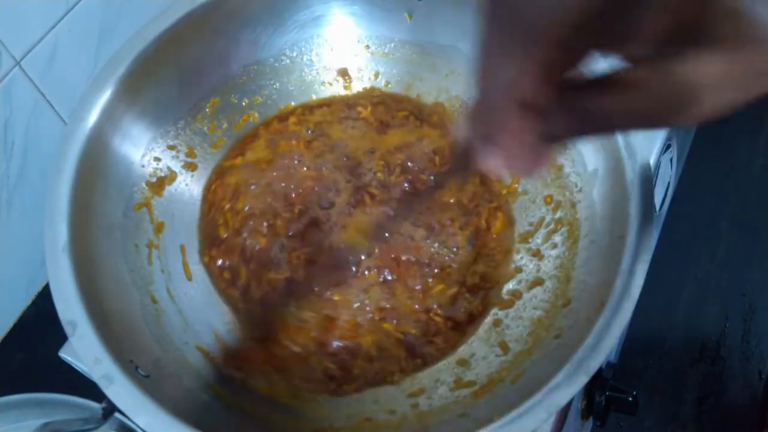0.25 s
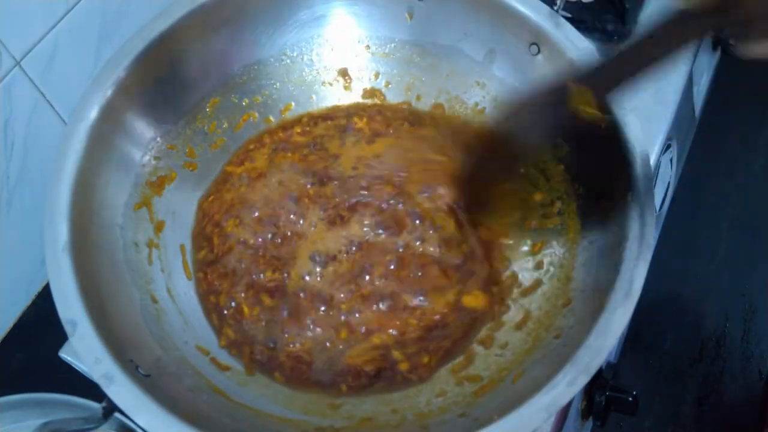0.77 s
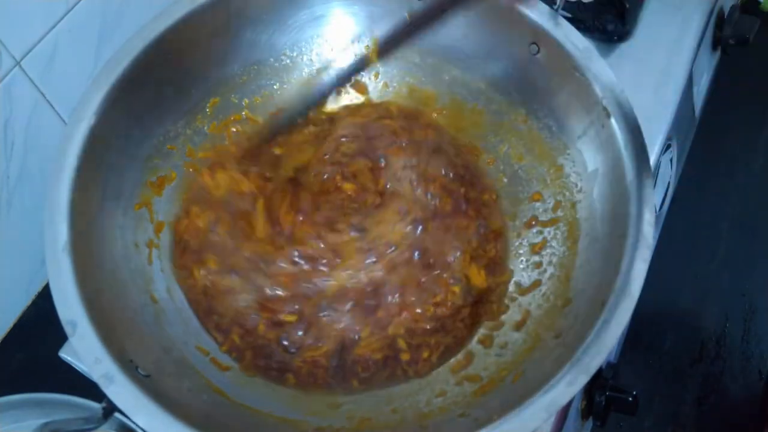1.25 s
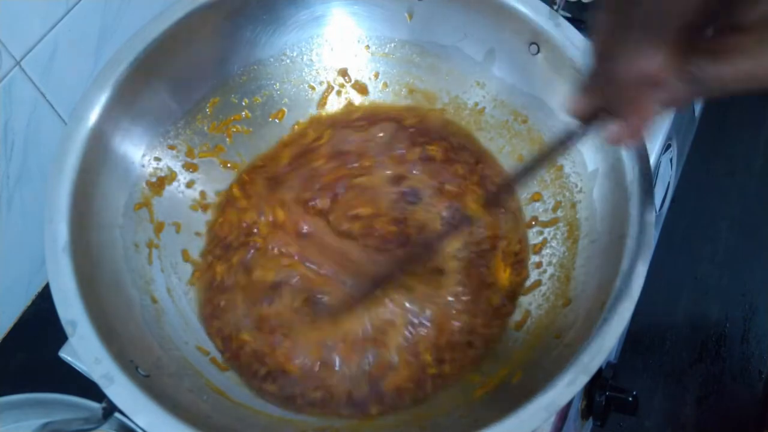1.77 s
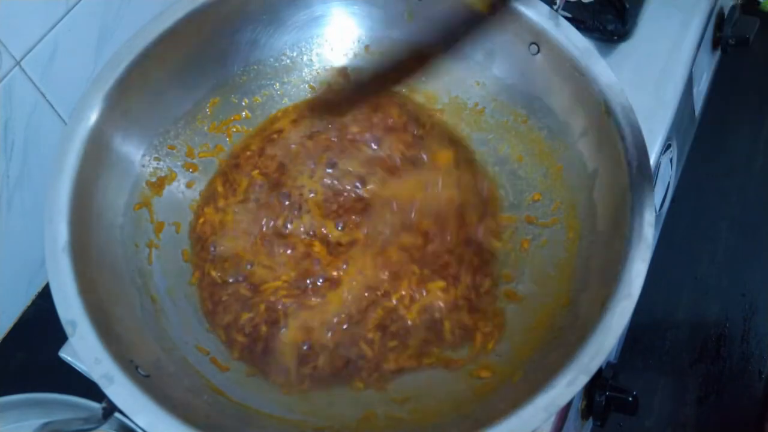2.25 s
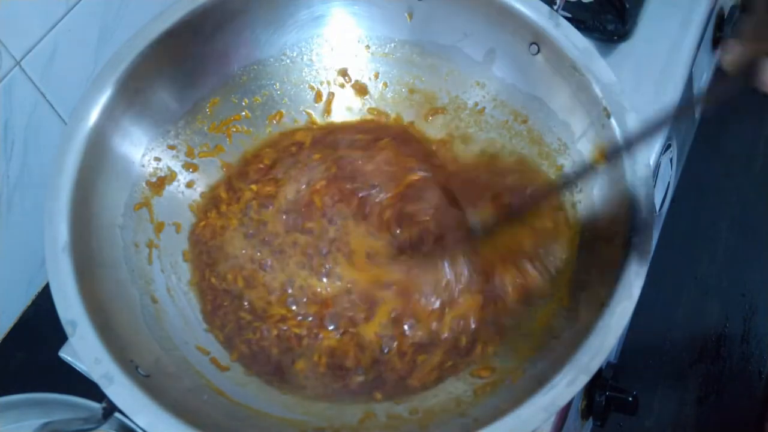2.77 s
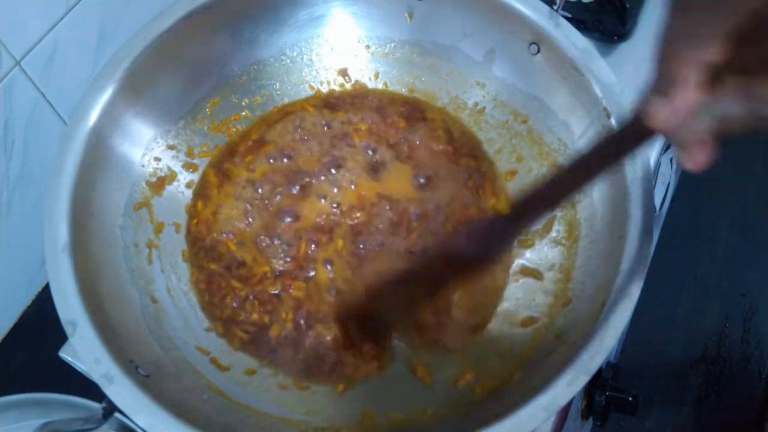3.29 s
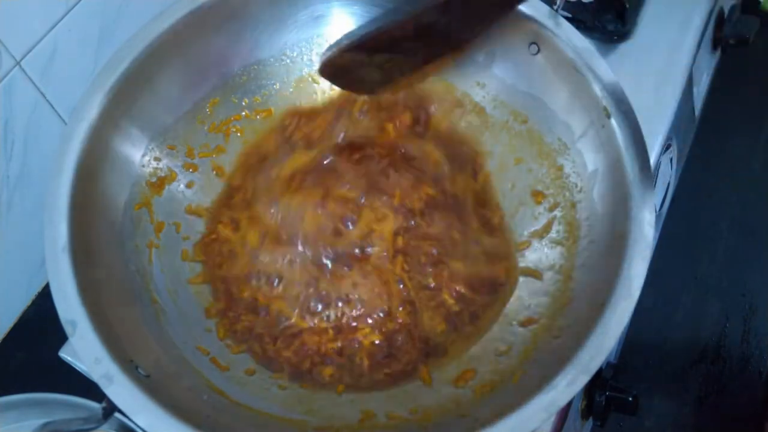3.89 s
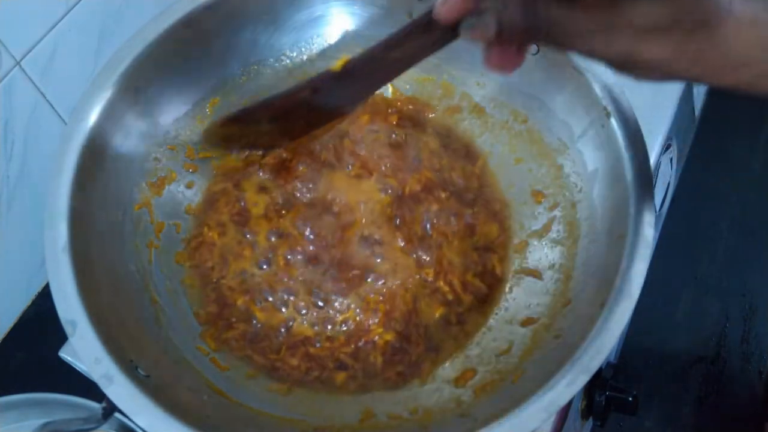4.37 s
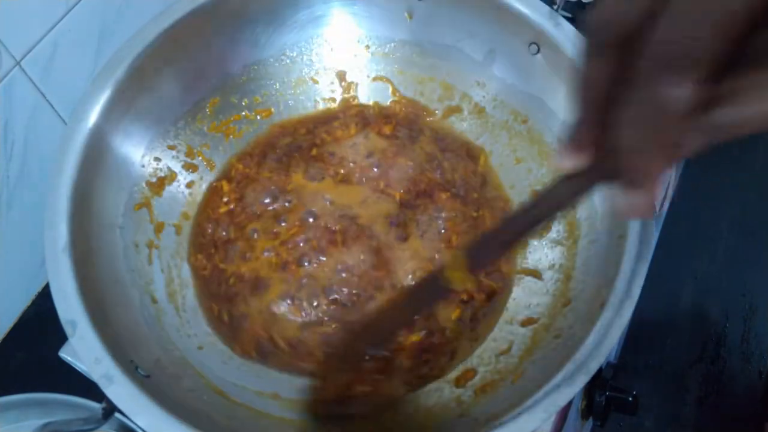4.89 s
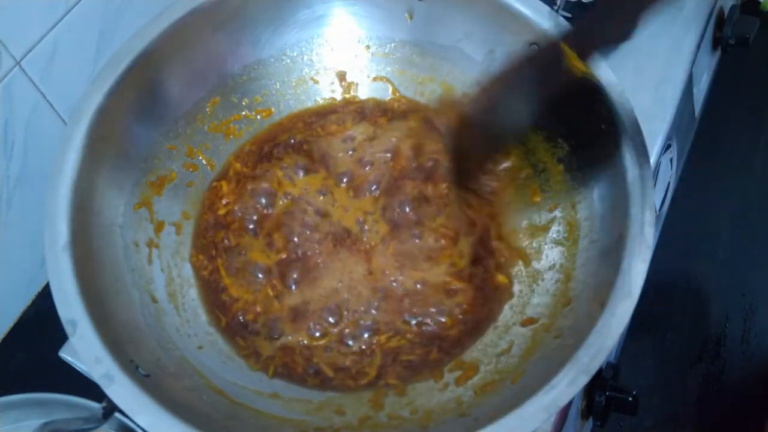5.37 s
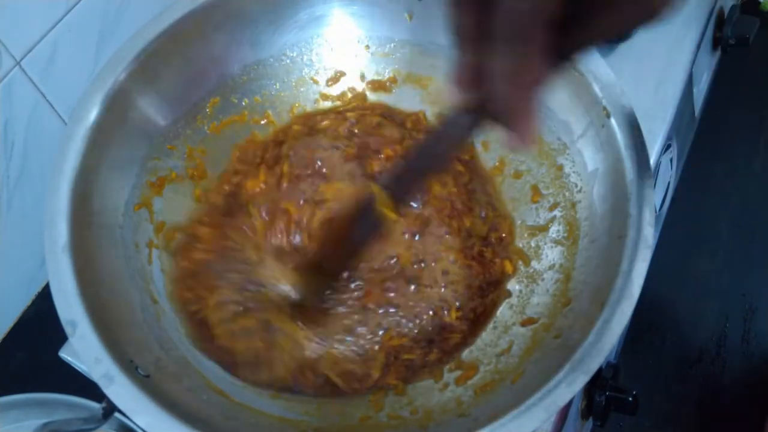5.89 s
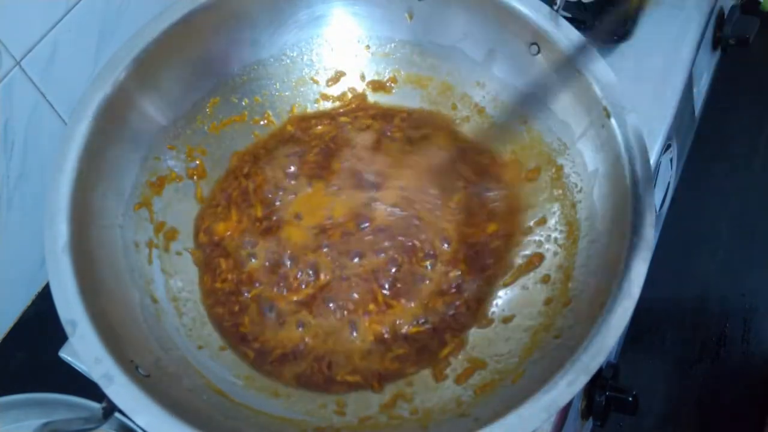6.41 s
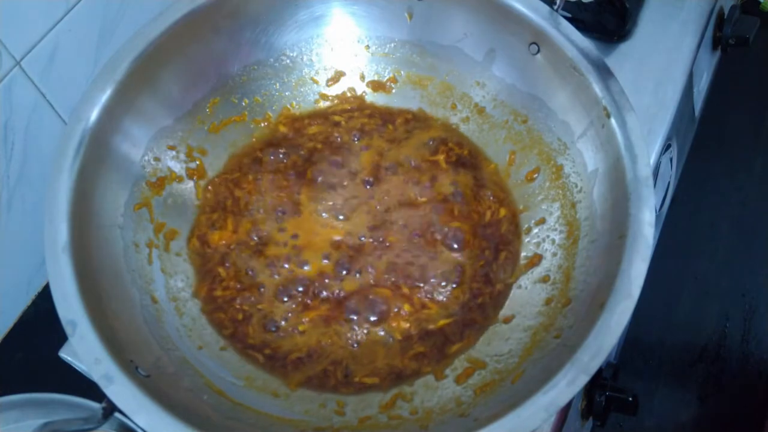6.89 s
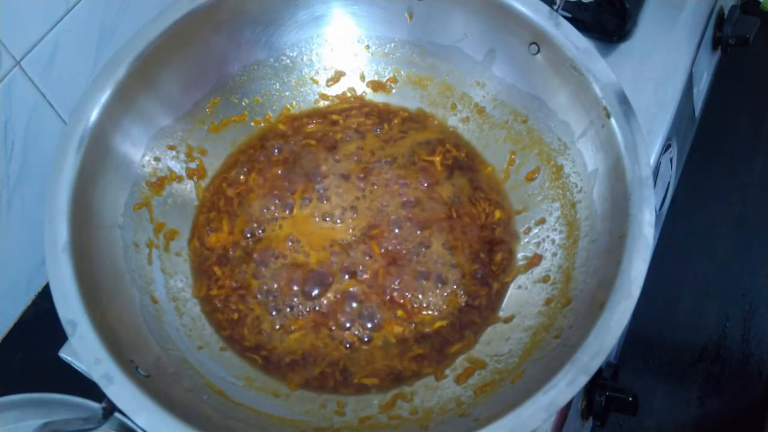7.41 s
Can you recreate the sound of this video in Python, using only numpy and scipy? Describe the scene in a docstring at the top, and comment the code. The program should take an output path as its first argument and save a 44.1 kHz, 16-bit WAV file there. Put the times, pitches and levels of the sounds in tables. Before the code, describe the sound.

Sticky simmering mixture pops and spits as wood stirs through it in a metal pan, with gritty scrapes, wet smacks and a ringing knock.

```python
"""A low hum, dragging wood and plopping bubbles run throughout: thick sweet pulp is stirred in a thin metal pan.
Random clicks shake pan resonances for the drag and set off short cycles in the bowl for the bubbles.
Filtered noise makes the hum, scraping and squeaks; bursts make the spits, pops and wet smacks.
A wooden spatula also knocks on the pan, as a thud, a crack and ringing sines.
A short noise tail echoes in the small tiled kitchen; the microphone's right port faces the pan."""
import sys
import numpy as np
from scipy import signal
from scipy.io import wavfile
from scipy.ndimage import uniform_filter1d

SR = 44100
rng = np.random.default_rng(int(sys.argv[2]) if len(sys.argv) > 2 else 0)


def to_wav(s):
    """Save 16-bit WAV."""
    ch = np.atleast_2d(s).T  # columns
    pcm = np.round(np.clip(ch, -1, 1) * 32767)  # PCM
    wavfile.write(sys.argv[1], SR, pcm.astype(np.int16))


N = 337365


def amp(db):
    """Turns dB into a gain."""
    return 10 ** (np.asarray(db) / 20)


def evened(x):
    """Scales a sound to an rms of 1."""
    return x / np.sqrt(np.mean(x ** 2) + 1e-20)


def read(points, hz):
    """Reads a two-column table at any pitch, along a logarithmic pitch axis."""
    table_hz, value = np.transpose(points)
    return np.interp(np.log(hz + 1), np.log(table_hz + 1), value)


def curve_at_samples(rows):
    """Joins the points of a time curve with straight lines, one value per sample."""
    s, value = np.transpose(rows)
    return np.interp(np.arange(N) / SR, s, value)


def add(mix, s, sound):
    """Mixes a sound in at time s, cut off where the mix ends."""
    part = mix[..., round(s * SR):][..., :sound.shape[-1]]
    part += sound[..., :part.shape[-1]]


def placed(x, side_db):
    """Two channels whose mean is x, the left side_db above the right."""
    ratio = amp(side_db)
    return np.array([2 * ratio / (1 + ratio) * x, 2 / (1 + ratio) * x])


def resonate(x, hz, width):
    """A resonance of gain 1: shifts hz down to zero, smooths, and shifts back."""
    turn = np.exp(2j * np.pi * np.cumsum(hz * np.ones(len(x))) / SR)
    memory = np.exp(-np.pi * width / SR)
    smooth = signal.lfilter([1 - memory], [1, -memory], x / turn)
    return 2 * (turn * smooth).real


def band(x, low_hz, high_hz):
    """Keeps the sound between two pitches."""
    sos = signal.butter(3, [low_hz, high_hz], "bandpass", fs=SR, output="sos")
    return signal.sosfilt(sos, x)


def clicks(per_s, spread_db):
    """A random train of clicks of either sign, a few of them large."""
    size = amp(spread_db * np.minimum(rng.exponential(1, N), 5))
    size = size * rng.choice([-1., 1.], N)
    return size * (rng.random(N) < per_s / SR)


def blip(hz, cycles):
    """A cavity bursts: a few cycles that swell and die, with a peak of 1."""
    u = np.arange(int(4 * cycles * SR / hz) + 8) * hz / SR / cycles
    wave = u ** 2 * np.exp(-4 * u) * np.sin(2 * np.pi * cycles * u)
    return wave / abs(wave).max()


# How alike the two channels of noise are. Each row: pitch in Hz, likeness from 0 to 1.
LIKENESS = [(60, 0.9), (400, 0.93), (1200, 0.53), (3000, 0.05), (12000, 0.36)]
# How noise differs between the microphone ports. Each row: pitch in Hz, left above right in dB.
PORT_BALANCE = [(100, -11.5), (500, -27), (1200, -11), (3000, -2), (9000, -9.5), (14000, 1.5)]


def noise(spectrum_db, frames, size=512, patchy_db=0.):
    """Two partly alike channels of noise, shaped by spectrum_db(hz, s) and by random patches."""
    hz = np.fft.rfftfreq(size, 1 / SR)[:, None]
    s = np.arange(frames) * size / 4 / SR
    a, b, c, d, patches = rng.standard_normal((frames, size // 2 + 1, 5)).T
    patches = uniform_filter1d(patches, size=2, axis=0)
    patches = evened(uniform_filter1d(patches, size=24, axis=1))
    same = np.clip(read(LIKENESS, hz), -1, 1)
    right = a + 1j * b
    left = same * right + np.sqrt(1 - same ** 2) * (c + 1j * d)
    ratio = amp(read(PORT_BALANCE, hz))
    level = amp(spectrum_db(hz, s) + patchy_db * patches)
    z = np.array([ratio * left, right]) / (1 + ratio) * level
    return signal.istft(z, nperseg=size, noverlap=size * 3 // 4)[1]


def summed(levels_db):
    """Level in dB of sounds heard together: their powers add up."""
    return 10 * np.log10(sum(amp(db) ** 2 for db in levels_db))


def peaked(s, swell, fade, db):
    """A level that climbs 20 dB in swell seconds to its peak at s and falls 20 dB in fade seconds."""
    late = np.arange(N) / SR - s
    drop = np.maximum(late / max(fade, .01), -late / max(swell, .005))
    return np.maximum(db - 20 * drop, -150)


# Spatula blows on the pan. Each row: start in seconds, level in dB, share of treble in dB,
# extra low ring in dB, basic left above right in dB.
BLOWS = [(1.44, -6, -1, 0, -6), (2.488, -16, -19, -1, -5), (2.521, -23.5, -11, -11, -5),
         (4.027, -23.5, -33, -1, -4)]
BUSY_DB, KNOCK_DB = -55, -15  # usual bubbling and a reference knock


def stirred(curve, usual_db, follow, jolt_db, jolt_follow, t60):
    """Level of a layer: it follows a curve of bubbling, and every knock shakes it up for a moment."""
    jolts = [peaked(s + .005, .005, t60 / 3, jolt_db + jolt_follow * (db - KNOCK_DB))
             for s, db, *_ in BLOWS]
    busy_db = curve_at_samples(curve) - BUSY_DB
    return summed([usual_db + follow * busy_db] + jolts)


# Broad hush of the room. Each row: pitch in Hz, relative level in dB per Hz.
HUSH_SPECTRUM = [(15, -70.5), (25, -48), (97, 26), (127, 7.5), (180, 6), (317, 16), (463, -28),
                 (754, -23.5), (936, -64), (1260, -16), (1440, -5.5), (2350, -8.5), (11000, -16),
                 (13200, -53), (16000, -65)]
# Room resonances in the hum. Each row: pitch in Hz, width in Hz, level in dB.
HUM_RESONANCES = [(73.55, 5.4, -66), (105.2, 3.4, -62), (130.7, 2.8, -61.5)]
HUSH_DB = -57


def hum():
    """The steady room: a broad hush of noise and three low resonances."""
    hush = noise(lambda hz, s: read(HUSH_SPECTRUM, hz), N // 512 + 5, size=2048)[:, :N]
    drive = rng.standard_normal(N)
    low = sum(amp(db) * evened(resonate(drive, hz, width)) for hz, width, db in HUM_RESONANCES)
    return amp(HUSH_DB) * evened(hush) + placed(low, -11.5)


# Ringing modes of the pan. Each row: pitch in Hz, relative level in dB,
# time to fall 60 dB after a blow in seconds (shorter in the drag and the bubbles).
PAN_MODES = [(248.6, -12, 0.3), (321.8, 0, 0.36), (385, -12, 0.28), (440, -13, 0.3), (635, -15, 0.3),
             (743, -9, 0.2), (904, -16, .26), (1105, -10, 0.2), (1340, -24, 0.3), (3700, -34, 0.24),
             (4840, -20, 0.22), (4900, -16, 0.22), (5900, -37, 0.34), (7240, -25, 0.24)]
# How busily the pulp bubbles. Each row: time in seconds, busyness in dB (-55 is usual).
BUBBLING = [(0.0, -48.5), (0.149, -79), (0.231, -52.5), (0.47, -74.5), (0.7, -53), (0.83, -58),
            (0.88, -52.5), (1.34, -53), (1.409, -56), (1.73, -52), (2.0, -57), (2.32, -66), (2.66, -58.5),
            (2.75, -53.5), (2.92, -59.5), (3.6, -53.5), (3.68, -65.5), (3.83, -56), (3.96, -56.5),
            (4.28, -53), (4.5, -57.5), (4.81, -54.5), (5.18, -59.5), (5.279, -54), (6.67, -54.5),
            (7.01, -63), (7.07, -57), (7.65, -53.5)]
# How drag, large and middle bubbles (one row for each) follow the stirring.
# Each row: level at usual stirring in dB, dB per dB of stirring, jolt level after a -15 dB knock in dB,
# dB per dB of knock, time for the jolt to fall 60 dB in seconds.
LAYER_RULES = [(-53.5, 1, -36.5, 0.35, 0.28), (-56, 1.79, -42, -0.15, 0.28),
               (-52.5, 1.15, -43.5, 0.82, 0.25)]
# The spatula leans hard and drags louder.
# Each row: peak time in seconds, 20 dB swell in seconds, 20 dB fade in seconds, level in dB.
LEANS = [(0.7, 0.23, 0.29, -49), (2.752, 0.048, 0.071, -48), (3.3, 0.09, 0.23, -54),
         (3.83, 0.22, 0.086, -49), (5.297, 0.24, 0.27, -46), (6.271, 0.23, 0.43, -46)]
LIFT_S, LIFTED_DB = 7.5, -5.5  # the spatula leaves the pan and the drag drops


def drag():
    """Wood slips over the pan wall in small jerks and shakes its low modes, damped by the pulp."""
    jerks, damping = clicks(900, 3.), 5
    body = sum(amp(db) * resonate(jerks, hz, damping / t60) * np.sqrt(t60)
               for hz, db, t60 in PAN_MODES if hz < 600)
    body = evened(body) + 0.67 * evened(band(jerks, 182, 620))
    lifted = np.clip((np.arange(N) / SR - LIFT_S) * 10, 0, 1)  # takes a tenth of a second
    body = body * amp(LIFTED_DB * lifted)
    level_db = summed([stirred(BUBBLING, *LAYER_RULES[0])] + [peaked(*row) for row in LEANS])
    return placed(amp(level_db) * evened(body), -14.5)


# Air in the bowl, for large and then middle bubbles. Each row: pitch in Hz, basic width in Hz.
BOWL_AIR = [(660, 405), (1240, 144)]
# How busily the middle bubbles come. Each row: time in seconds, busyness in dB (-55 is usual).
MIDDLE_BUBBLING = [(0.0, -54.5), (0.15, -65.5), (0.19, -63.5), (0.401, -65.5), (0.5, -80), (0.64, -60.5),
                   (1.249, -56), (2.001, -59.5), (2.24, -84), (2.66, -60), (2.73, -58.5), (3.17, -63.5),
                   (3.26, -61.5), (3.6, -59.5), (3.98, -64), (4.27, -60.5), (4.498, -65), (4.79, -56.5),
                   (5.3, -62.5), (5.349, -58), (6.711, -62), (6.971, -75), (7.06, -58.5), (7.65, -60)]
SPLIT_HZ = 600  # parts the low pan modes from the upper ones
PLOP_CYCLES, PLACES_DB, PLOP_RING_DB = 2.2, 6., 11.  # plop length, sideways shift, pan ring gain


def simmer():
    """Plops of random size come in shared clusters and ring the bowl's air and the pan's middle modes."""
    out = np.zeros((2, N))
    cluster = amp(2.1 * evened(uniform_filter1d(rng.standard_normal(N), size=1100)))
    layers = zip(LAYER_RULES[1:], (BUBBLING, MIDDLE_BUBBLING), BOWL_AIR, (-4.5, -10.5))
    for rule, curve, (bowl_hz, width), side_db in layers:
        plops = np.zeros((2, N))
        for k, hz in enumerate(bowl_hz * np.geomspace(.75, 1.3, 8)):
            plop = np.pad(blip(hz, PLOP_CYCLES), (0, SR // 10))
            for _ in range(2):
                plop = resonate(plop, bowl_hz, 2.33 * width)
            plop = plop + sum(amp(db + PLOP_RING_DB) * resonate(plop, f, 5 / t60)
                              for f, db, t60 in PAN_MODES if SPLIT_HZ < f < 1500)
            train = signal.oaconvolve(clicks(22, 2.76), plop)[:N]
            # neighbours alternately further left and further right
            plops += placed(train, side_db + PLACES_DB * (-1) ** k)
        plops *= cluster
        out += amp(stirred(curve, *rule)) * plops / plops.mean(0).std()
    return out


# Colour of the smooth hiss. Each row: pitch in Hz, relative level in dB per Hz.
HISS_SPECTRUM = [(2940, -127), (5000, 1.5), (5480, -1.5), (5930, -3.5), (7100, -0.5), (8790, 7),
                 (10200, 11), (11800, 4.5), (12800, -14), (14900, -20.5), (16000, -25)]
# Strokes of wet scraping and sizzle. Each row: peak time in seconds, 20 dB swell in seconds,
# 20 dB fade in seconds, hiss level in dB, dull part in dB, bright part in dB.
# Swell and fade have upper limits in the dull part; so has the fade in the bright part.
SCRAPE_STROKES = [(0.64, 0.1, 0.15, -58.5, -66, -89), (1.023, 0.065, 0.15, -45.5, -45.5, -66),
                  (1.106, 0.15, 0.17, -47.5, -42, -67), (1.449, 0.016, 0.5, -55, -37.5, -81),
                  (1.641, 0.059, 0.16, -48.5, -51, -63.5), (1.95, 0.43, 0.16, -54.5, -88, -79),
                  (2.021, 0.039, 0.072, -45.5, -61, -57), (2.53, 0.15, 0.23, -53, -79, -64),
                  (2.729, 0.043, 0.4, -68, -46, -72), (3.41, 0.17, 0.075, -58, -56.5, -68.5),
                  (3.49, 0.11, 0.17, -76, -56.5, -91), (3.58, 0.075, 0.079, -49.5, -61, -69),
                  (3.791, 0.18, 0.12, -62.5, -54, -78), (4.249, 0.12, 0.45, -51.5, -62, -68.5),
                  (4.36, 0.12, 0.16, -58, -64, -59), (4.708, 0.096, 0.17, -57.5, -55, -94),
                  (4.94, 0.02, 0.3, -55, -53.5, -71), (5.12, 0.12, 0.16, -46.5, -60.5, -69),
                  (5.23, 0.42, 0.085, -45.5, -60, -55), (5.771, 0.015, 0.1, -55, -52, -87),
                  (6.03, 0.76, 0.96, -58, -84, -80.5), (6.602, 0.038, 0.07, -56, -54.5, -78)]
SIZZLE_DB, DULL_DB = -71, -69  # levels between strokes
DULL_FADE_S = 0.1  # longest swell or fade of the dull part


def scrape():
    """Gritty hiss of tiny bursts; a dull band swells as the edge digs in, a bright one on bared metal."""
    level_db, dull_db, bright_db = [SIZZLE_DB], [DULL_DB], []
    for s, swell, fade, hiss_peak, dull_peak, bright_peak in SCRAPE_STROKES:
        level_db.append(peaked(s, swell, fade, hiss_peak))
        dull_db.append(peaked(s, min(swell, DULL_FADE_S), min(fade, DULL_FADE_S), dull_peak))
        bright_db.append(peaked(s, swell, min(fade, 0.3), bright_peak))

    def dull_spectrum(hz, s):
        """A flat-topped band around 4500 Hz."""
        return -40 * abs(np.log(hz / 4500 + 0.00096)) ** 15.0

    def bright_spectrum(hz, s):
        """A narrower band around 13200 Hz."""
        return -40 * abs(4.1 * np.log(hz / 13200 + 0.001)) ** 4

    frames, patchy_db = N // 128 + 5, 4.5
    hiss = noise(lambda hz, s: read(HISS_SPECTRUM, hz), frames, patchy_db=patchy_db)[:, :N]
    dull = noise(dull_spectrum, frames, patchy_db=patchy_db)[:, :N]
    bright = noise(bright_spectrum, frames, patchy_db=patchy_db)[:, :N]
    scratches = evened(band(clicks(350, 3.), 2400, 6500))
    dull = evened(dull) + .6 * placed(scratches, -6)
    grit = 1 + uniform_filter1d(abs(clicks(260, 3.5)), size=40) * 9
    # the edge sticks and slips
    grit *= amp(2.02 * evened(uniform_filter1d(rng.standard_normal(N), size=900)))
    out = amp(summed(level_db)) * evened(grit * hiss)
    out += amp(summed(dull_db)) * evened(grit * dull)
    return out + amp(summed(bright_db)) * evened(grit * bright)


# Spits and ticks. Each row: start in seconds, level of the tick in dB, pitch in Hz,
# left above right in dB, starting level of the spray against the tick in dB.
SPIT_TICKS = [(0.0348, -41, 10900, -1, -14), (0.6111, -41.5, 9000, -6, -9.5),
              (0.9438, -36.5, 9530, -10, -22), (1.0176, -25.5, 9500, 1, -7), (1.03, -30.5, 8700, 1, -1.5),
              (1.1082, -28.5, 5920, -7, -7.5), (1.1153, -21.5, 9380, -42, -24.5),
              (1.3265, -45.5, 2850, -9, -16.5), (1.3552, -32, 2940, -12, -17.5),
              (2.122, -42.5, 4230, -12, -24), (2.4786, -40.5, 10200, -15, -23), (2.521, -44, 2780, -4, 3),
              (2.734, -43, 5460, -6, -13), (2.7486, -27, 10400, 1, -20.5), (2.8373, -27, 9370, -5, -18.5),
              (2.8569, -46.5, 3050, -8, -24), (3.268, -46, 13000, 34, -11), (3.395, -31, 9100, -12, -27),
              (3.452, -34.5, 2580, -4, -7.5), (3.56, -37.5, 6050, -2, -19.5),
              (3.7751, -39.5, 6520, -43, -5), (4.194, -38, 10270, 0, -18), (4.355, -34.5, 11200, -1, -23),
              (4.6765, -43.5, 8300, -3, 2), (4.7135, -28.5, 9100, -7, -7.5), (4.9272, -32.5, 8400, 0, -3),
              (4.9628, -39.5, 10100, 1, 2), (5.063, -37, 9200, -5, -14.5), (5.136, -28.5, 8500, -2, -12.5),
              (5.674, -35, 8450, -11, -16), (5.773, -44.5, 2500, -13, -2), (6.598, -40.5, 8100, -3, 3),
              (6.8212, -45, 5200, -4, -13.5), (7.084, -46.5, 3040, -41, -17),
              (7.422, -36, 10100, -3, -16.5)]


def spits():
    """A tick with a gritty spray of droplets around the same pitch, dying away."""
    out, t = np.zeros((2, N)), np.arange(SR // 5) / SR
    chance = rng.standard_normal((len(SPIT_TICKS), len(t)))
    for (s, db, hz, side_db, spray_db), drops in zip(SPIT_TICKS, chance):
        spray = evened(band(drops * abs(drops), 0.53 * hz, min(1.31 * hz, 15000)))
        spray = spray * amp(spray_db - 60 * t / 0.039)
        add(spray, 0, blip(hz, 5.3))
        add(out, s, placed(amp(db) * spray, side_db))
    return out


# Wet smacks as the pulp parts from the pan.
# Each row: start in seconds, level in dB, pitch in Hz, time of the added 60 dB fade in seconds.
WET_SMACKS = [(0.193, -38.5, 1920, 0.074), (0.9815, -39.5, 1770, 1), (1.0865, -33.5, 3340, 0.083),
              (1.23, -44.5, 3000, 0.16), (1.3548, -49.5, 2850, 0.55), (1.619, -37.5, 1890, 0.32),
              (2.004, -39.5, 1470, 0.25), (2.716, -51.5, 3150, 1), (2.75, -38.5, 1660, 0.33),
              (2.84, -42, 2880, 0.096), (2.9954, -49.5, 2060, 0.1), (3.246, -41.5, 1650, 0.23),
              (3.366, -36, 1870, 0.052), (3.426, -45, 2680, 0.56), (3.472, -40, 2960, 0.18),
              (3.5159, -36, 2064, 0.23), (3.9215, -42.5, 1860, 0.11), (4.0291, -35.5, 1850, 0.43),
              (4.134, -45.5, 2240, .5), (4.2196, -43.5, 2110, 0.75), (4.2875, -48.5, 1945, 0.53),
              (4.698, -40, 2070, 0.068), (4.784, -35, 2200, 0.24), (4.9255, -32.5, 2660, 0.042),
              (5.126, -32, 1550, 0.075), (5.465, -40, 1630, 0.11), (5.619, -46.5, 1740, 0.13),
              (5.6756, -46, 2260, 0.66), (5.7175, -34.5, 1760, 0.22), (5.861, -39.5, 2380, 0.048),
              (5.9953, -42, 1910, 0.18), (6.1509, -45.5, 1700, 1), (6.236, -41.5, 1710, 0.27),
              (6.4037, -40.5, 1710, 0.14), (6.563, -43, 1770, 0.57), (6.795, -47, 2380, 0.3),
              (7.0343, -40, 2440, 0.064)]


def smacks():
    """Each smack starts at once and crackles out in a steep-sided band, for half a second at most."""
    t, out = np.arange(SR // 2) / SR, np.zeros(N)
    crackle = clicks(1000, 3.)
    for s, db, hz, t60 in WET_SMACKS:
        part = np.roll(crackle, -round(s * SR))[:len(t)]
        part = band(part, 0.74 * hz, 1.28 * hz)
        part = band(part, 0.47 * hz, 1.15 * hz)
        part = band(part, 200, 2.35 * hz)
        fade = amp(db - 60 * t / max(t60, .03))
        add(out, s, fade * part / np.percentile(abs(part), 99))
    return placed(out, -12.0)


# Single bubbles. Each row: start in seconds, level in dB, starting pitch in Hz, left above right in dB.
SINGLE_BUBBLES = [(0.196, -37, 1267, -14), (1.221, -37, 1050, -12), (1.2494, -35.5, 1280, -7),
                  (1.32, -33, 1470, -9), (1.326, -38, 1420, -4), (1.355, -41.5, 990, -4),
                  (1.851, -36.5, 1150, -7), (2.008, -38, 654, -4), (2.276, -40.5, 1120, -1),
                  (2.736, -37, 706, -4), (3.025, -42.5, 1040, -25), (3.229, -37.5, 1040, -6),
                  (3.268, -35, 1250, -5), (3.295, -34.5, 1090, -6), (3.348, -39, 1220, -8),
                  (3.476, -39, 1190, -17), (3.503, -31, 1103, -2), (3.804, -37.5, 697, -4),
                  (4.062, -33, 1395, -3), (4.196, -32.5, 990, -9), (4.335, -41, 850, -19),
                  (4.7, -40.5, 770, -6), (4.768, -32.5, 1210, -13), (4.786, -32, 1039, -4),
                  (4.969, -37, 1050, -26), (5.073, -37, 1360, -5.5), (5.125, -40.5, 603, -3),
                  (5.406, -34, 940, -6), (5.571, -40.5, 950, -8), (5.602, -37, 790, -29),
                  (5.686, -36.5, 870, -8), (5.904, -39, 1100, -11), (5.826, -37.5, 1000, -6),
                  (5.963, -38, 796, -8), (6.075, -39, 840, -6), (6.119, -32.5, 725, 0),
                  (6.656, -33.5, 1400, -15), (7.05, -45, 1220, -10), (7.139, -31, 1390, -10),
                  (7.182, -38.5, 630, -9), (7.23, -42.5, 1190, -14), (7.298, -40.5, 1360, -14),
                  (7.433, -31, 1243, -11.5), (7.511, -35.5, 1220, -22), (7.585, -28.5, 986, -12)]
POP_RING_DB = -10.  # ring of a pop against its burst


def pops():
    """Single bubbles burst at their own pitch and place, each ringing briefly at a rising pitch."""
    out, t = np.zeros((2, N)), np.arange(SR // 12) / SR
    for s, db, hz, side_db in SINGLE_BUBBLES:
        rising = np.sin(2 * np.pi * hz * (t + 2.8 * t ** 2))
        pop = amp(POP_RING_DB - 60 * t / 0.049) * rising * np.minimum(t * hz / 2, 1)
        add(pop, 0, blip(hz, 1.7))
        add(out, s, placed(amp(db) * pop, side_db))
    return out


LOW_SIDE_DB, THUD_SIDE_DB = 2., -5.5  # low modes lie nearer the middle, the thud further right


def knocks():
    """A thud in the bowl, a crack, and the pan's modes ringing; each blow has its own share of treble."""
    out, t = np.zeros((2, N)), np.arange(SR) / SR
    chance = rng.random((len(BLOWS), len(PAN_MODES), 3))
    rattle = rng.standard_normal((len(BLOWS), SR))
    split = np.array([-.017, 0, .023])[:, None]  # the dented pan splits each upper mode in three
    swell = 1 - np.exp(-t / .004), 1 - np.exp(-t / .05)  # upper modes start fast, low ones build up
    for (s, db, treble_db, low_db, side_db), luck, hiss in zip(BLOWS, chance, rattle):
        ring = np.zeros((2, SR))  # upper modes, low modes
        for (hz, level, t60), phase in zip(PAN_MODES, luck):
            low = int(hz < SPLIT_HZ)
            detune = (1 - low) * (hz * split * t + phase[:, None])
            lines = np.sin(2 * np.pi * (hz * t + detune)).sum(0)
            mode_db = level - 17 + treble_db * (hz > 2500) + low_db * low
            ring[low] += amp(mode_db - 60 * t / t60) * lines * swell[low]
        crack = band(hiss, 3470, 7100) * amp(treble_db - 3.0 - 60 * t / 0.024)
        crack = crack * (1 - np.exp(-t / 0.0024))
        # pulp shaken by the blow
        splash = evened(band(hiss, 220, 1200)) * amp(-24.0 - 60 * t / 0.14)
        add(out, s, placed(amp(db) * blip(1100, 2.0), side_db + THUD_SIDE_DB))
        add(out, s, placed(amp(db) * (ring[0] + crack), side_db))
        add(out, s, placed(amp(db) * (ring[1] + splash * swell[0]), side_db + LOW_SIDE_DB))
    return out


# Squeaks of wet wood on metal.
# Each row: start in seconds, level in dB, pitch in Hz, time to fall 60 dB in seconds.
WOOD_SQUEAKS = [(2.123, -54, 4370, 0.087), (3.113, -61, 2570, 0.36), (6.505, -70, 3484, .4)]


def squeaks():
    """Rubbing noise in one narrow resonance, filtered twice, that fades."""
    out, t = np.zeros(N), np.arange(SR // 4) / SR
    rubs = rng.standard_normal((len(WOOD_SQUEAKS), len(t)))
    for (s, db, hz, t60), rub in zip(WOOD_SQUEAKS, rubs):
        tone = evened(resonate(resonate(rub, hz, 200), hz, 200))
        add(out, s, amp(db - 60 * t / max(t60, .03)) * tone)
    return placed(out, -26.5)


# How long the kitchen echoes. Each row: pitch in Hz, time to fall 60 dB in seconds.
KITCHEN_DECAY = [(300, 0.38), (1000, 0.44), (4000, 0.31), (12000, 0.32)]


def kitchen(x):
    """A noise tail that builds up over some milliseconds, each band dying at its own speed."""
    tail = noise(lambda hz, s: -60 * s / read(KITCHEN_DECAY, hz), 300, size=256)[:, 128:]
    tail *= 1 - np.exp(-np.arange(tail.shape[1]) / SR / 0.0082)
    tail = tail / np.linalg.norm(tail.mean(0))
    return signal.fftconvolve(x.mean(0)[None], tail, axes=1)[:, :N]


def scene():
    """Blows and bubbles echo in the kitchen over the scraping, drag and hum."""
    blows, hits = knocks(), pops() + spits()
    bubbles = simmer() + smacks() + squeaks()
    blow_echo_db, hit_echo_db, bubble_echo_db = -11, -5.5, -7.5
    echo = kitchen(amp(blow_echo_db) * blows + amp(hit_echo_db) * hits + amp(bubble_echo_db) * bubbles)
    return blows + hits + bubbles + echo + scrape() + drag() + hum()


# Phase between the ports. Each row: pitch in Hz, turn of the left port ahead in radians.
PORT_LEAD = [(100, 0.05), (700, 0.15), (1290, 0.7), (2200, 0.3), (9000, 1.2), (13000, .8)]
EDGE_HZ = 15700  # top of the sound


def record(dry):
    """The two ports differ in phase; a suppressor lowers bands near their quiet level; then the band limit."""
    hz, _, z = signal.stft(dry, SR, nperseg=1024, noverlap=768)
    lead = read(PORT_LEAD, hz)[:, None]
    z[0] *= np.exp(1j * lead)
    z[1] *= np.exp(-1j * 0.62 * lead)  # the right port turns back by less
    power = uniform_filter1d((abs(z) ** 2).mean(0), size=7, axis=0)
    power = uniform_filter1d(power, size=5, axis=1)
    quiet_power = np.percentile(power, 15, axis=1)[:, None]
    over_db = 10 * np.log10(power / quiet_power + 1e-9)
    closeness = np.clip(2.0 - over_db / 3.63, 0, 1)
    z *= amp(-8. * closeness * (hz > 450)[:, None])  # up to 8 dB lower, above the bass only
    quieted = signal.istft(z, SR, nperseg=1024, noverlap=768)[1][:, :N]
    low_pass = signal.firwin(511, EDGE_HZ, window=("kaiser", 9), fs=SR)
    return signal.oaconvolve(quieted, low_pass[None], "same")


dry = scene()
out = record(dry)
to_wav(out)
```